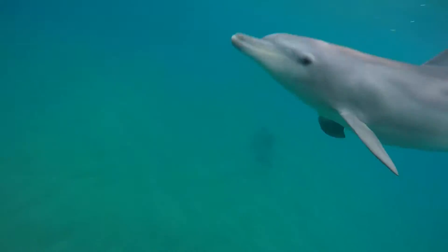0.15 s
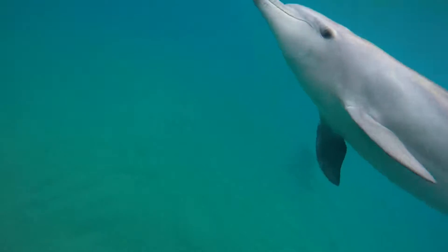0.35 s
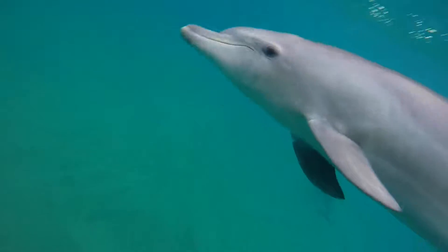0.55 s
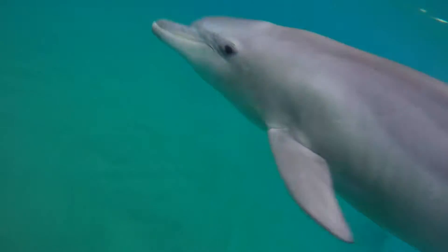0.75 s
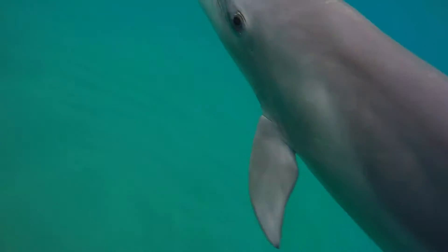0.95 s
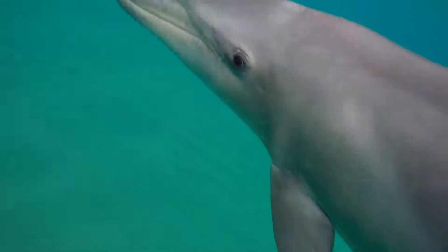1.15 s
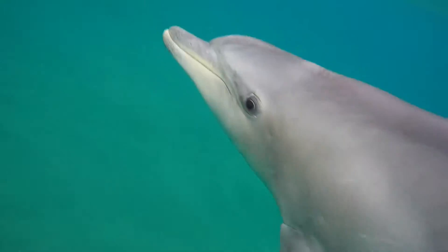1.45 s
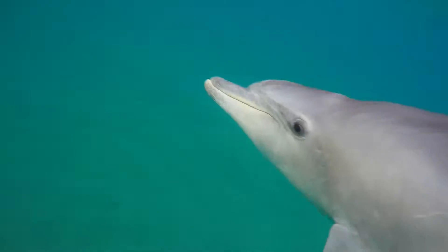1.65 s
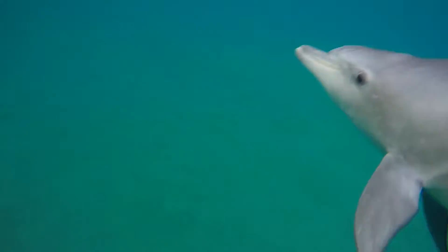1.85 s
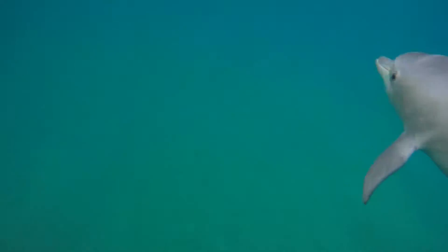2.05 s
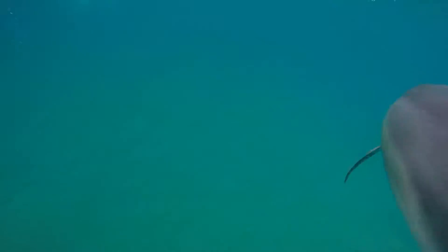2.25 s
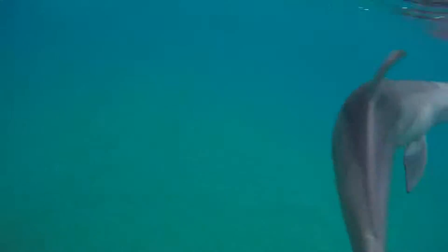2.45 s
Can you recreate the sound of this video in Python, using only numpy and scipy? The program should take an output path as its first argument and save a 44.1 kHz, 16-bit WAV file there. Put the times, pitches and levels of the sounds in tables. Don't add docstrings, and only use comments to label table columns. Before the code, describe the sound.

Deep water rumble swells and dies around a sealed underwater microphone, with hollow plops, a faint arched dolphin whistle, sharp creaking knocks, then a train of sonar clicks and small bubbles in open sea.

```python
import sys
import numpy as np
from scipy import signal
from scipy.fft import rfft, irfft
from scipy.io import wavfile
from scipy.ndimage import uniform_filter1d

SR = 44100
rng = np.random.default_rng(int(sys.argv[2]) if len(sys.argv) > 2 else 0)


def persist_wave(psi):
    counts = np.round(np.clip(psi, -1, 1) * 32767).astype(np.int16)
    wavfile.write(sys.argv[1], SR, np.atleast_2d(counts).T)


def volts_from_decibels(level):
    exponent = np.asarray(level, float) / 20
    return 10 ** exponent


N = 114660

# (time [s], level [dB])
FLOW = [
    (0, -27.5),
    (.35, -24.5),
    (.62, -22),
    (.8, -15.5),
    (1.5, -17),
    (1.75, -23),
    (2.0, -27),
    (2.2, -33.5),
    (2.6, -36.5),
]


def rms_one(x):
    return x / np.sqrt(np.mean(x ** 2) + 1e-20)


def in_time(rows):
    s, *cols = np.transpose(rows)
    return [np.interp(np.arange(N) / SR, s, c) for c in cols]


def drift(rate):
    r = np.exp(-2 * np.pi * rate / SR)
    return rms_one(signal.lfilter([1], [1, -2 * r, r * r], rng.standard_normal(N + SR))[SR:])


def ring(clicks, hz, t60):
    r, w = volts_from_decibels(-60 / (t60 * SR)), 2 * np.pi * hz / SR
    return signal.lfilter([0, np.sin(w)], [1, -2 * r * np.cos(w), r * r], clicks + 1e-18)


def strikes(s, gain):
    out = np.zeros(N)
    np.add.at(out, (np.asarray(s) * SR).astype(int), gain)
    return out


def cut(x, hz, kind, order):
    return signal.sosfilt(signal.butter(order, hz, kind, fs=SR, output="sos"), x)


def wash(spectrum, patchy_db, rate):
    hz, db = np.transpose(spectrum)
    f = np.maximum(np.fft.rfftfreq(N + SR, 1 / SR), 1)
    colour = volts_from_decibels(np.interp(np.log(f), np.log(hz), db, left=-90, right=-90))
    noise = rfft(rng.standard_normal(N + SR)) * colour
    place = np.log(f / hz[0]) / np.log(hz[-1] / hz[0]) * 15
    out, together = 0, drift(rate / 4)
    for k in range(16):
        band = irfft(noise * np.clip(1 - abs(place - k), 0, 1), N + SR)[:N]
        out = out + band * volts_from_decibels(patchy_db * (1.04 * together + drift(rate)))
    return rms_one(out)


def flow():
    # (frequency [Hz], density [dB per Hz])
    rumble_colour = [(12, -7), (20, 2.5), (38, 0.5), (80, -17), (190, -24.5), (250, -34), (420, -40)]
    # (frequency [Hz], density [dB per Hz])
    rush_colour = [(750, 5), (1000, 3.5), (1400, -5.5), (2600, -7.5), (3300, -8.5), (4300, -27),
                   (7000, -44)]
    flow_db, = in_time(FLOW)
    below_top_db = flow_db - flow_db.max()
    rush = volts_from_decibels(-58 + 7.0 + 0.96 * below_top_db) * wash(rush_colour, patchy_db=1, rate=5.8)
    rumble = wash(rumble_colour, patchy_db=1, rate=17.6)
    rumble = rumble / np.sqrt(uniform_filter1d(rumble ** 2, size=5000))
    upper = cut(rumble, 80, "high", order=2)
    rumble = rumble + upper * (volts_from_decibels(.4 * below_top_db) - 1)
    return volts_from_decibels(flow_db) * rumble + rush


def pocket():
    # (frequency [Hz], density [dB per Hz])
    lapping = [(200, -24), (380, -12), (500, 1), (680, -2), (850, -38.5), (1100, -50), (1300, -97)]
    # (time [s], peak [dB], pitch [Hz])
    plop_list = [(0.077, -29.5, 626), (0.232, -30, 587), (0.346, -31, 604), (0.427, -28.5, 669),
                 (0.48, -26, 593), (0.637, -21.5, 596), (0.859, -23, 557), (0.929, -27, 456),
                 (1.539, -21.5, 576), (1.596, -18.5, 612), (1.8, -35, 610), (1.87, -35.5, 878),
                 (1.89, -35, 762), (1.923, -27.5, 596), (1.951, -28.5, 565), (2.05, -31, 410),
                 (2.094, -26, 702), (2.19, -43, 610), (2.274, -25.5, 668), (2.31, -32.5, 521),
                 (2.33, -33.5, 577), (2.395, -26, 676), (2.428, -27.5, 587), (2.546, -25.5, 517)]
    # (time [s], pitch [Hz], level [dB])
    big_bubble = [
        (1.53, 310, -50),
        (1.575, 305, -44),
        (1.6, 295, -41),
        (1.64, 275, -42),
        (1.71, 297, -45),
        (1.8, 296, -47),
        (1.84, 295, -51),
        (1.88, 303, -47),
        (1.93, 315, -48),
    ]
    laps_per_s, lap_cycles = 65, 18.3
    sizes = volts_from_decibels(2.8 * np.minimum(rng.exponential(1, N), 2)) * (rng.random(N) < laps_per_s / SR)
    dealt = rng.integers(0, 12, N)
    laps = 0
    for k, hz in enumerate(np.geomspace(440, 760, 12)):
        laps = laps + ring(sizes * (dealt == k), hz, lap_cycles / hz)
    flow_db, = in_time(FLOW)
    fast = np.clip(1 + (flow_db - flow_db.max()) / 6, 0, 1)
    drops = volts_from_decibels(-44.5 - 5 * fast) * rms_one(laps)
    for s, db, hz in plop_list:
        pushes = strikes(s + (np.arange(4) - 2) / hz, volts_from_decibels(db - 8) * np.ones(4))
        drops = drops + ring(pushes, hz, 0.074 * volts_from_decibels(.6 * (db + 24)))
    drops = cut(cut(drops, 474, "high", order=2), 860, "low", order=4)
    hz, db = in_time([(1.45, 300, -91), *big_bubble, (2.0, 315, -90)])
    phase = 2 * np.pi * np.cumsum(hz * (1 + .006 * drift(25))) / SR
    bubble = volts_from_decibels(db + 6 + drift(29)) * np.sin(phase)
    return drops + volts_from_decibels(-41.5) * wash(lapping, patchy_db=4.0, rate=35.3) + bubble


def shell():
    knock_s = [.9622, .9666, .9719, .9772, .9831, .9903, .9966, 1.0039, 1.0162, 1.0998, 1.1205, 1.1640,
               1.1720, 1.1810, 1.1869]
    # (peak [dB], brightness [dB per octave], hold [s], top [Hz], low modes [dB])
    knocks = [(-36, -6, .002, 3000, 0), (-23, 5, .001, 18000, -3), (-18, 5, .0015, 11000, -1),
              (-14, 4, .002, 9500, 1), (-15.5, 3, .0018, 10000, 0), (-11, 1, .0038, 8000, 2),
              (-11, 1, .0035, 9500, 1), (-14, 5, .002, 9500, 0), (-17, 7, .0015, 10000, -1),
              (-5, 1, .0025, 8000, -6), (-33, -6, .002, 2500, 3), (-8, -1, .003, 7500, -1),
              (-13, 1, .004, 7000, -3), (-32, -2, .002, 9000, -3), (-12, -3, .0035, 7500, -3)]
    # (frequency [Hz], level [dB], t60 [s])
    shell_modes = [(968, -2, 0.006), (1122, -0.5, 0.014), (1330, -6, 0.012), (1810, -11.5, 0.01),
                   (2320, -16, 0.01), (2838, 4, 0.0079), (3040, -5, 0.012), (4090, -8.5, 0.012),
                   (5090, -5.5, 0.003), (6740, -8.5, 0.0018), (9200, -12, 0.0025)]
    # (frequency [Hz], level [dB], t60 [s])
    tap_modes = [(1050, -9, 0.0062), (1520, -16.5, 0.014), (2025, -0.5, 0.012), (2440, 2.5, 0.0066),
                 (3170, 0.5, 0.011), (4030, -5, 0.019), (4730, -6.5, 0.0094), (6230, -13.5, 0.0058),
                 (7300, -19.5, .005)]
    tap_s, tap_db = .6704, -12.5
    crack_s, rebound_s, rebound_db = .001, .0023, -5
    out = np.zeros(N)
    for k, (hz, db, t60) in enumerate(tap_modes):
        out += (-1) ** k * ring(strikes([tap_s], volts_from_decibels(tap_db + db)), hz, t60)
    t = np.arange(900) / SR
    hz, mode_db, t60 = np.transpose(shell_modes)[:, :, None]
    chance = rng.random((len(knocks), 3, len(shell_modes), 1))
    noise = rng.standard_normal((len(knocks), 900))
    for s, (db, tilt_db, hold, top_hz, low_db), (a, b, c), n in zip(knock_s, knocks, chance, noise):
        held = hold * np.minimum(3000 / hz, 1) ** 1.2
        level_db = mode_db - 7.5 + low_db * (hz < 1500) + 0.96 * (a - .5)
        level_db = level_db + tilt_db * np.log2(np.maximum(hz / 2800, 1))
        sag_db = 4 * np.minimum(t / held, 1)
        fall_db = 60 * np.maximum(t - held, 0) / np.minimum(t60, .008)
        tones = np.sin(2 * np.pi * (hz * (1 + .055 * (b - .5)) * t + c))
        modes = (volts_from_decibels(level_db - sag_db - fall_db) * tones).sum(axis=0)
        rebound = (hold > rebound_s) * (t > rebound_s) * np.exp(-(t - rebound_s) / crack_s)
        crack = np.exp(-t / crack_s) + volts_from_decibels(rebound_db) * rebound
        rough = np.tanh(2 * cut(n, [3500, max(top_hz, 5000)], "band", order=2))
        bright = volts_from_decibels(-10 + tilt_db) * crack * rough
        body = cut((modes + bright) * np.minimum(t / 0.000087, 1), top_hz, "low", order=3)
        air = volts_from_decibels(-36 + 2 * tilt_db) * crack * cut(n, 10000, "high", order=2)
        out[int(s * SR):][:900] += volts_from_decibels(db) * (body + air)
    return cut(out, 750, "high", order=4)


def sonar():
    # (time [s], peak [dB], snap [dB])
    click_list = [(1.23, -23, 6), (1.3009, -17, 4.5), (1.39, -13, 1.5), (1.4863, -13.5, 0),
                  (1.5754, -16.5, 0), (1.6333, -16, -0.5), (1.6753, -16.5, 0), (1.7155, -16.5, 3.5),
                  (1.7508, -17, 2.5), (1.7874, -18, 4), (1.8264, -20.5, 6), (1.8743, -21.5, 7),
                  (1.9471, -27.5, 4.5)]
    # (frequency [Hz], level [dB], t60 [s])
    answer = [(1583, -6, 0.023), (1850, 3.5, 0.0067), (2300, 2.5, 0.0054), (2680, -5.5, 0.013),
              (3550, -25, 0.015)]
    # (frequency [Hz], level [dB], t60 [s])
    snap = [(4400, -34, 0.0033), (5530, -31.5, 0.0039), (6800, -28, 0.0041), (8870, -26.5, .003),
            (9870, -25.5, 0.0044), (11640, -27.5, 0.0054), (13000, -30, .003), (14100, -26, .003),
            (15650, -27, .003)]
    snap_s, tail_s = .0005, 0.032
    s, db, snap_db = np.transpose(click_list)
    vary = rng.standard_normal((len(s), len(answer)))
    out = np.zeros(N)
    for k, (hz, level_db, t60) in enumerate(answer):
        hits = strikes(s + 0.00049, volts_from_decibels(db + 2 + level_db + 1.13 * vary[:, k]))
        out += (-1) ** k * ring(hits, hz, t60)
    t = np.arange(300) / SR
    hz, level_db, t60 = np.transpose(snap)[:, :, None]
    chance = rng.random((len(s), 3, len(snap), 1))
    for start, top_db, (a, b, c) in zip(s + 0.0005, db + snap_db, chance):
        fall_db = 60 * np.maximum(t - snap_s * (.5 + a), 0) / t60
        gain = volts_from_decibels(top_db + level_db + 2.3 * (a - 1.0) - fall_db) * np.minimum(t / snap_s * 2, 1)
        tones = np.sin(2 * np.pi * (hz * (1 + .1 * (b - .5)) * t + c))
        out[int(start * SR):][:300] += (gain * tones).sum(axis=0)
    echoes = strikes(s + 0.0076, volts_from_decibels(db - 31.5))
    fade = signal.lfilter([1], [1, -volts_from_decibels(-60 / (tail_s * SR))], echoes)
    tail = fade * rms_one(cut(rng.standard_normal(N), [1600, 3400], "band", order=2))
    return cut(out + tail, 1560, "high", order=5)


def whistle():
    # (time [s], pitch [Hz], level [dB])
    rising = [(.257, 6270, -55), (.28, 6580, -62), (.3, 6680, -49.5), (.325, 8000, -61), (.36, 9600, -48),
              (.41, 11360, -65), (.437, 12250, -55), (.452, 13700, -59.5), (.472, 13850, -49)]
    falling = [(.528, 15000, -63), (.54, 15150, -80), (.552, 15150, -58), (.582, 14700, -55),
               (0.61, 13700, -63), (0.653, 12700, -68), (.68, 10920, -47.5), (0.704, 10170, -62),
               (.745, 9150, -54)]
    ending = [(.77, 7900, -74), (.782, 7700, -64), (.802, 7400, -65), (.812, 7800, -70), (.832, 7650, -70)]
    rows = [*rising, *falling, *ending]
    before = (rows[0][0] - .004, rows[0][1], -120)
    after = (rows[-1][0] + .004, rows[-1][1], -120)
    hz, db = in_time([before, *rows, after])
    phase = 2 * np.pi * np.cumsum(hz * (1 + .005 * drift(154))) / SR
    overtone = volts_from_decibels(-12) * np.clip((15000 - 2 * hz) / 800, 0, 1) * np.sin(2 * phase)
    return volts_from_decibels(db + 4 + 3 * drift(94)) * (np.sin(phase) + overtone)


def haze():
    start_s, end_s, level_db, centre_hz = .58, .86, -72.5, 14100
    db, = in_time([(start_s - .1, -120), (start_s, level_db), (end_s, level_db), (end_s + .05, -120)])
    band = cut(rng.standard_normal(N), [centre_hz - 400, centre_hz + 500], "band", order=3)
    return volts_from_decibels(db + 3.5 * drift(60)) * rms_one(band)


def specks(rate, centre, wide, db, low_hz, high_hz):
    rate = rate * np.exp(-.5 * ((np.arange(N) / SR - centre) / wide) ** 2)
    sizes = volts_from_decibels(db + 4 * np.minimum(rng.exponential(1, N), 3)) * (rng.random(N) < rate / SR)
    dealt = rng.integers(0, 10, N)
    out = 0
    for k, hz in enumerate(np.geomspace(low_hz, high_hz, 10)):
        out = out + ring(sizes * (dealt == k), hz, 38 / hz)
    return out


def fizz():
    # (time [s], peak [dB], pitch [Hz])
    bubbles = [(.926, -55, 9600), (1.055, -49, 13500), (1.147, -53, 5470), (1.2, -33, 2800),
               (1.205, -41, 2900), (1.351, -40.5, 3800), (1.422, -45, 2820), (1.448, -34, 2780),
               (1.458, -43, 2660), (1.617, -35, 2500), (1.622, -34, 1850), (1.773, -55, 9000),
               (1.782, -30.5, 3970), (1.811, -35, 4230), (1.823, -26.5, 3620), (1.844, -32, 2600),
               (1.916, -53, 12500), (2.04, -59, 9500), (2.105, -55, 10900), (2.104, -58, 9500),
               (2.112, -53, 6300), (2.124, -28, 1780), (2.124, -59, 9500), (2.129, -32.5, 4400),
               (2.13, -51, 9400), (2.136, -56, 11100), (2.141, -30.5, 5270), (2.142, -48, 11200),
               (2.141, -52, 13300), (2.141, -37.5, 2990), (2.145, -31, 3170), (2.146, -54, 9500),
               (2.151, -50, 5400), (2.159, -47, 9600), (2.16, -49, 11300), (2.16, -51, 13400),
               (2.159, -55, 6000), (2.16, -49, 1980), (2.166, -52, 11200), (2.171, -50, 2600),
               (2.171, -53, 14800), (2.179, -50, 6800), (2.186, -53, 3600), (2.398, -38.5, 2580)]
    ring_cycles, burst_s = 38, .002
    out, t = np.zeros(N), np.arange(400) / SR
    noise = rng.standard_normal((len(bubbles), 400)) * np.exp(-t / burst_s)
    for (s, db, hz), n in zip(bubbles, noise):
        burst = strikes(s + t, n)
        tone = ring(burst, hz, ring_cycles / hz)
        snap = volts_from_decibels(-21) * cut(burst, hz, "high", order=2)
        out += volts_from_decibels(db) * (tone / abs(tone).max() + snap)
    swarm = specks(220, 1.65, .45, -62, 1700, 5560)
    crackle = specks(500, 2.145, .03, -62, 2450, 14600)
    return cut(out, 1460, "high", order=4) + swarm + crackle


def sea():
    # (frequency [Hz], density [dB per Hz])
    hiss = [(900, -51), (1500, 3), (2600, -4), (4200, -1), (5000, -6.5), (13000, -15), (15300, -14),
            (15600, -55)]
    return volts_from_decibels(-63.5) * wash(hiss, patchy_db=0.5, rate=43)


def scene():
    return (flow() + pocket() + shell() + sonar() + whistle() + haze() + fizz() + sea())[None]


def roll_off(x):
    return signal.sosfilt(signal.butter(12, 16510, fs=SR, output="sos"), x)


def record(dry):
    mix = cut(dry, 15400, "low", order=12)
    return roll_off(mix)


dry = scene()
out = record(dry)
persist_wave(out)
```